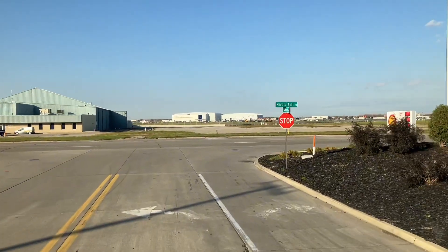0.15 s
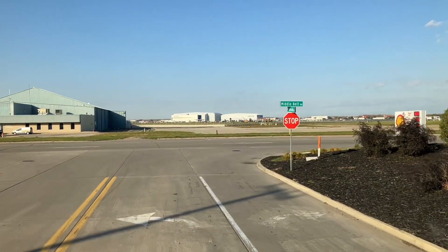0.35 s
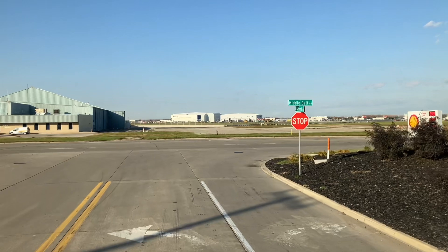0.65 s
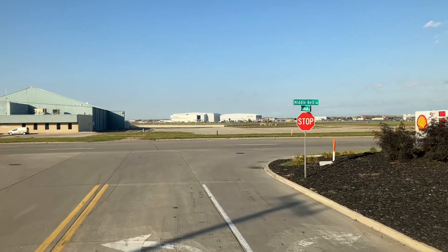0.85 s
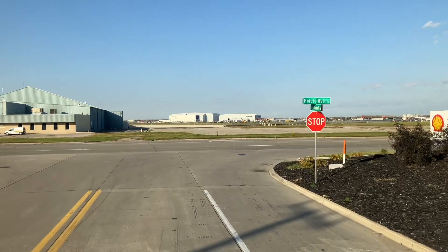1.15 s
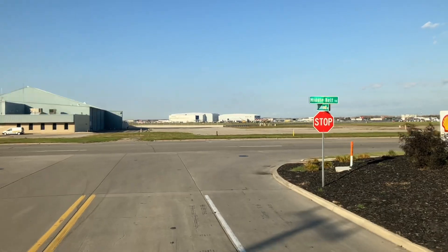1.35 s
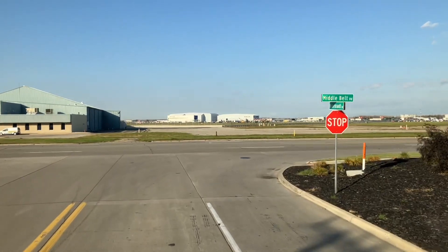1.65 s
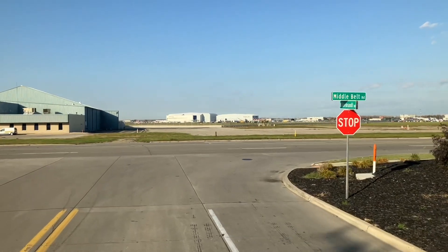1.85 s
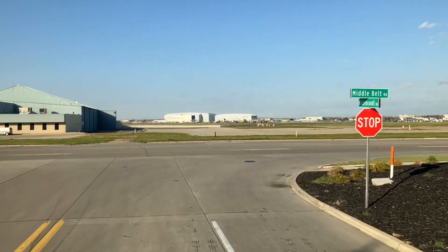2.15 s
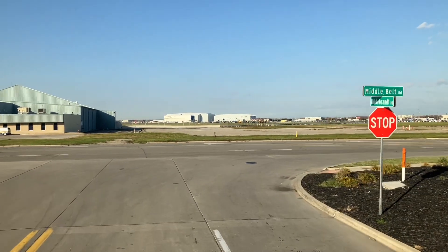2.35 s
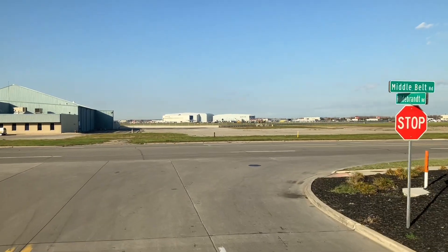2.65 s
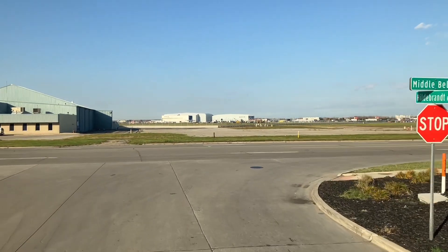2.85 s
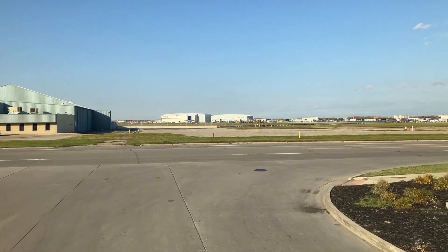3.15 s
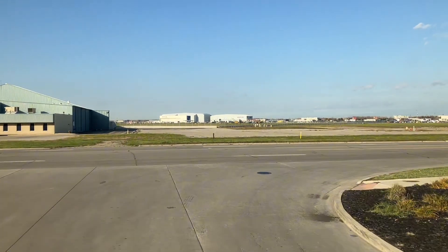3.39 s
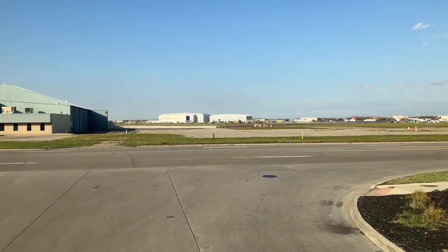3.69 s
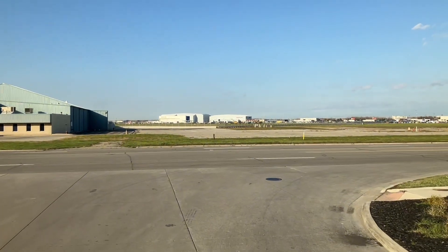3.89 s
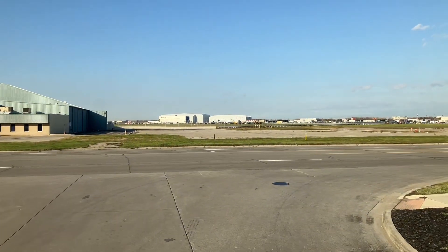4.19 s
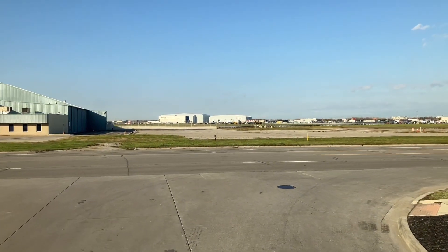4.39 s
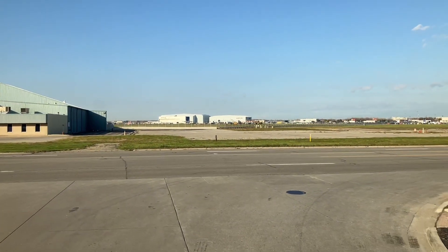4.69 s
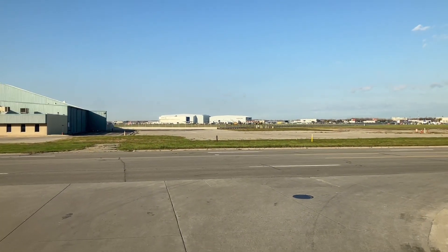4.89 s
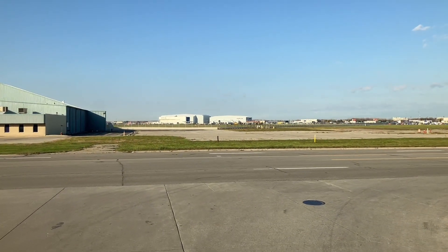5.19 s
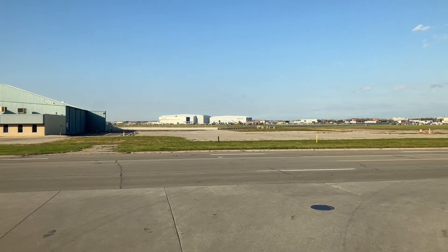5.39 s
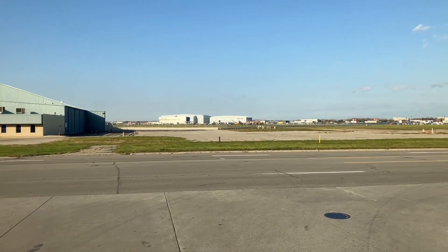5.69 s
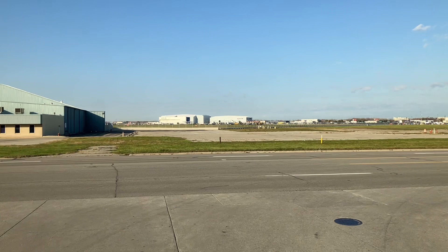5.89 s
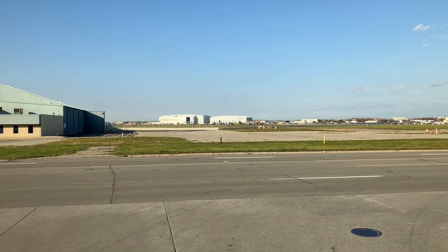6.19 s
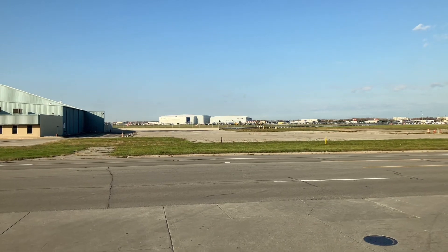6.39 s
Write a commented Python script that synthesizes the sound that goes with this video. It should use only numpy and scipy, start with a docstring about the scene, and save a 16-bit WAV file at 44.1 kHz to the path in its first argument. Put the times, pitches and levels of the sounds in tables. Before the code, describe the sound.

The sound is heard from inside the cab of a slowing truck. From the start, a diesel engine booms deeply over steady tyre noise, with a light clatter that fades by about 2 seconds. The turn signal ticks and tocks evenly throughout, about three clicks a second. From around 1 second the engine sinks gradually in pitch, humming through the cab, and a very faint turbo whistle falls in spurts until about 6 seconds. The boom swells between roughly 1.3 and 4 seconds, then eases. Faint squeaks come from the cab just before 1 second and around 2.5 seconds, the latter with a couple of small dry clicks from the trim. At about 6.1 seconds the horn gives one loud, brassy blast of two close notes sounding together. It lasts a quarter of a second, briefly pushing the other sounds down, and dies away quickly.

```python
"""Inside a truck cab rolling up to a junction. From the start the diesel booms at its firing rate and
clatters over the tyre roar, while the indicator relay ticks steadily. As the engine winds down, its
orders hum through the cab's air resonances and the turbo whistles ever lower; the trim clicks and
squeaks faintly. Near the end two diaphragm horns, about a whole tone apart, sound one short blast,
which pushes an automatic gain control down."""
import sys
import numpy as np
from scipy import signal
from scipy.fft import rfft, irfft, next_fast_len
from scipy.io import wavfile
from scipy.ndimage import uniform_filter1d, minimum_filter1d, map_coordinates

SR = 44100
rng = np.random.default_rng(int(sys.argv[2]) if len(sys.argv) > 2 else 0)


def wav_record(signal):
    """Record a signal, one row per channel, as 16-bit PCM in the file named by sys.argv[1]."""
    frames = np.transpose(np.atleast_2d(signal))
    bounded = np.clip(frames, -1, 1)
    # unit amplitude maps onto the largest positive 16-bit level
    quanta = np.round(bounded * 32767).astype(np.int16)
    wavfile.write(sys.argv[1], SR, quanta)


N = 288414
TIME = np.arange(N) / SR

# Levels in the tables are relative: each source adds its own gain.
# Firing rate of the slowing diesel: time_s, rate_hz
FIRING_RATE = [(0, 60), (.45, 62), (.67, 60), (1, 54.3), (1.3, 49.1), (1.8, 49), (2.2, 47.7), (2.5, 45.3),
               (2.66, 48), (2.85, 46.2), (3.17, 45.1), (3.6, 44.7), (4, 42.7), (4.6, 40.9), (4.9, 40),
               (5.3, 38.2), (6.54, 36.5)]
# Exhaust boom: time_s, level_db
BOOM_LEVEL = [(0, -20), (.1, -16.5), (.3, -24), (1.15, -20), (1.32, -13), (1.75, -11), (2.1, -15.5),
              (2.54, -14), (2.67, -26), (2.8, -16), (3.05, -17), (3.3, -13), (3.65, -10.5), (3.85, -15),
              (4.2, -15.5), (4.5, -21.5), (6.05, -25.5), (6.54, -47)]
# Spectrum of the cab panels shaken by the engine: frequency_hz, level_db
PANEL_SPECTRUM = [(35, -42), (60, 0), (134, -20.5), (194, -14), (255, -16), (297, -20), (334, -18.5),
                  (386, -36.5), (520, -23.5), (680, -63.5), (1140, -120)]
# Shaft and accessory orders: firing_multiple, level_db
HUM_ORDERS = [(1.75, -30.5), (2, -22.5), (3, -29), (3.5, -25.5), (4, -32.5), (4.35, -37), (5.25, -36.5),
              (5.75, -31), (7.5, -34.5), (8.75, -25.5), (9.5, -28)]
# Air resonances of the cab: centre_hz, width_hz, level_db
CAB_MODES = [(74.8, 10.7, 1.5), (89.4, 10.2, 0), (113.5, 15, -5.5), (139.3, 3.6, -13), (160.8, 6.5, -6),
             (184.1, 6.9, -2), (198.8, 13.4, 0), (214.4, 8.3, -12.5), (244.5, 11, -9.5), (259.4, 15.6, 2),
             (337.6, 16.3, -6.5), (374, 19, -17)]
# Diesel clatter, loud while the engine pulls: time_s, level_db
CLATTER_LEVEL = [(0, -37.5), (.25, -35), (.6, -38.5), (.9, -43), (1.05, -54), (1.25, -43), (1.6, -44),
                 (1.95, -38), (2.15, -54), (6.5, -63)]
# Resonances of the engine block: centre_hz, width_hz, level_db
BLOCK_MODES = [(612, 38, 0), (1008, 80, -0.5), (1154, 61, -1), (1440, 120, -9)]

# Partials of the low and the high horn: harmonic_number, left_db, right_db
LOW_HORN_PARTIALS = [(1, -17, -11.5), (2, -25, -31), (3, -17, -20.5), (4, -28.5, -32.5), (5, -37.5, -41),
                     (6, -25, -31.5), (7, -55, -45), (8, -36, -44), (9, -34.5, -38), (10, -56, -46),
                     (11, -35, -61), (12, -53, -36.5), (13, -44, -40), (14, -48, -55), (15, -46, -42),
                     (16, -53, -47), (17, -48, -46), (18, -49, -42), (19, -51, -45), (20, -47, -48),
                     (21, -49, -47)]
HIGH_HORN_PARTIALS = [(1, -21.5, -19), (2, -21, -20.5), (3, -49, -45), (4, -30, -33), (5, -23.5, -28),
                      (6, -36.5, -49), (7, -48, -33), (8, -35.5, -36.5), (9, -44, -37.5), (10, -42, -46),
                      (11, -42, -55), (12, -52, -45), (13, -55, -45), (14, -59, -56), (15, -49, -51),
                      (16, -52, -45), (17, -52, -49), (18, -48, -54), (19, -46, -51)]
# Faint top partials of the horns, with fixed filter notches near 9 and 13.3 kHz: frequency_hz, level_db
NOTCHED_HORN_TREBLE = [(7800, -46.5), (8300, -71), (9100, -92), (10000, -57), (11000, -54.5), (12200, -62),
                       (13300, -74), (15500, -61)]
# Ring after release, which each horn scales: frequency_hz, base_t60_s
HORN_DECAY = [(350, 0.19), (390, 0.4), (700, 0.24), (1100, 0.098), (3000, 0.12), (10000, 0.085)]
# Spectrum of the horns' rasp: frequency_hz, level_db
RASP_SPECTRUM = [(250, 0), (500, -1.5), (1200, 0.5), (3000, 1.5), (7000, -11), (11000, -27), (15500, -29.5)]

# Modes of the relay's case as it pulls in (tick) and drops out (tock): frequency_hz, level_db
TICK_MODES = [(602, 1), (1001, -9), (1195, 0.5), (1453, -7.5), (2034, -5.5), (2110, -11.5), (2562, -11),
              (2700, -1), (2756, 0.5), (2939, -1.5), (3020, -3), (3326, -7), (3413, -8), (3499, -9),
              (3692, -7), (4349, -7.5), (5232, -11), (5350, -11.5)]
TOCK_MODES = [(958, 3), (1098, 3.5), (1442, -3), (2030, -7.5), (2121, -0.5), (2390, -3.5), (2450, 1),
              (2939, -13), (3025, -8.5), (3262, -9), (3413, -7), (3811, -15), (4220, -15), (4748, -20),
              (5360, -20), (5566, -14.5)]
# Spectrum of the relay's contact: frequency_hz, level_db
CRACK_SPECTRUM = [(500, -24), (1200, -8), (3000, -2.5), (3650, -2.5), (3950, -15), (4450, -4.5),
                  (5100, -13.5), (5400, -5.5), (5750, -17.5), (6300, -21.5), (12000, -41)]

# The turbo running down: time_s, pitch_hz
TURBO_PITCH = [(1, 6600), (1.3, 6430), (1.95, 6300), (2.4, 5980), (3.05, 5670), (3.76, 5260), (4.6, 4760),
               (5.25, 4340), (6, 3830)]
# Turbo whistle spurts: start_s, shape_s, end_s, pitch_multiple, blur_fraction, level_db
# A spurt swells until shape_s; rows with shape_s before start_s only fade.
TURBO_SPURTS = [(1.1, 1.3, 1.4, 1, .002, -66), (1.85, 2.1, 2.4, 1, .002, -67),
                (2.95, 2.5, 3.95, 1, 0.0027, -71), (4.45, 5.3, 5.7, 1, .005, -70),
                (5.22, 5.25, 5.33, 1, .005, -57.5), (5.5, 5.59, 5.95, 1, 0.007, -65),
                (3.25, 3.3, 3.65, 1.375, 0.0057, -68.5), (3.68, 3.1, 4.7, 1.375, .007, -57.5),
                (4.7, 4.8, 5.1, 1.375, .007, -65), (3.5, 3.3, 3.8, 2, .004, -67)]

# Tyre roar as the truck slows: time_s, level_db
TYRE_LEVEL = [(0.0, -36), (0.23, -36), (1.0, -39.5), (1.79, -37.5), (1.97, -37.5), (2.17, -40.5),
              (2.94, -40), (3.09, -40.5), (6.0, -42.5)]
# Spectrum of the roar: frequency_hz, level_db
TYRE_SPECTRUM = [(250, -38), (340, -6), (420, -4), (580, -6.5), (790, -8), (886, -15.5), (1010, -10),
                 (1160, -11), (1500, -17), (1770, -23.5), (2680, -30), (5000, -44), (6500, -73),
                 (11000, -120)]
# Air hiss: time_s, level_db
HISS_LEVEL = [(0.0, -64.5), (0.8, -64), (0.92, -66.5), (1.27, -69), (1.55, -65.5), (2.17, -70),
              (3.53, -66.5), (3.81, -71), (5.11, -71), (5.43, -73.5), (5.9, -73.5), (6.0, -67.5)]
# Thin air hiss, with fixed filter notches at 9 and 13.5 kHz: frequency_hz, level_db
NOTCHED_HISS = [(1500, -12), (3000, -3), (5000, -1), (7000, 3.5), (9000, -16.5), (11500, 1), (13500, -20.5),
                (15500, -7)]
# Clicks of the cab trim: time_s, level_db, centre_hz
TRIM_CLICKS = [(2.236, -47, 5030), (2.618, -38.5, 10400)]
# Squeaks of the cab, then of the horn as it catches:
# start_s, pitch_hz, glide_hz_per_s, level_db, length_s, blur_fraction
SQUEAKS = [(.55, 10300, 1, -59, 0.33, 0.012), (0.833, 10350, 1, -53, .13, .016),
           (.88, 2380, -500, -49.5, 0.12, .04), (2.431, 2560, 547.5, -58, 0.36, 0.0415),
           (6.014, 7070, 0, -40, 0.025, .005), (6.035, 7360, 0, -43, 0.029, .015),
           (6.028, 3620, 0, -39, 0.021, .015), (6.048, 3620, -0.5, -43, 0.015, .015)]
# Likeness of left and right in the cab: frequency_hz, correlation
CAB_CORRELATION = [(60, 0.86), (130, 0.91), (290, 0.57), (640, -0.13), (3000, -0.064), (15000, 0.15)]
# Balance of the cab's sound field: frequency_hz, left_minus_right_db
CAB_BALANCE = [(60, 1.5), (110, 3), (200, -3.5), (380, 0), (700, 3.5), (1300, 0.5), (3000, 0)]

HORN_ON_S, HORN_OFF_S = 6.075, 6.32
LOW_HORN_HZ, HIGH_HORN_HZ = 351.05, 390.5
TOP_HZ = 15800
OPPOSED = np.array([[1], [-1]])  # opposite signs for left and right


def engine(firing_hz, level_db, cylinders=6):
    """Periodic forcing: a boom at the firing rate, orders from uneven cylinders, a throbbing rumble."""
    cycle = phase_of(firing_hz) / cylinders
    boom = amp(curve(BOOM_LEVEL) - 0.5 + 1.3 * wobble(16)) * unit(np.sin(cylinders * cycle))
    orders = np.zeros((2, N))
    for k in range(cylinders + 1, cylinders * (cylinders + 1) + 1):
        strength_db = at_hz(PANEL_SPECTRUM, firing_hz * k / cylinders) + 3 * wobble(3.005)
        spread = rng.normal(0, 0.24) * OPPOSED
        phase = k * cycle + rng.uniform(0, 2 * np.pi) + spread + 0.56 * wobble(7)
        orders += amp(strength_db) * np.sin(phase)
    orders = unit(filtered(orders, cab_balance))
    rumble = cab_noise(PANEL_SPECTRUM) * (1 + 0.58 * np.cos(cylinders * cycle)) * amp(3 * wobble(16))
    return boom * pan(-1.3) + amp(level_db - 4) * orders + amp(level_db - 3) * rumble


def cab_hums(firing_hz):
    """Resonance: each order swells on an air mode of the cab and fades as the engine slows past it."""
    out = np.zeros((2, N))
    for order, db in HUM_ORDERS:
        hz = order * firing_hz
        resonance = sum(amp(mode_db) / (1 + (2 * (hz - centre) / width) ** 2)
                        for centre, width, mode_db in CAB_MODES)
        tone = unit(np.sin(phase_of(hz) + rng.uniform(0, 2 * np.pi) + 0.1 * wobble(9)))
        out += amp(db - 3 + 1.68 * wobble(8)) * resonance * tone * cab_balance(hz)
    return out


def diesel_clatter(firing_hz):
    """Modal excitation: each firing rattles the engine block, some harder than others."""
    def block(hz):
        return sum((-1) ** k * amp(db) * 1j * resonator(hz, centre, width)
                   for k, (centre, width, db) in enumerate(BLOCK_MODES))
    throb = 1 + 0.69 * np.cos(phase_of(firing_hz))
    bursts = throb * amp(wobble(40)) * rng.standard_normal((2, N))
    return amp(curve(CLATTER_LEVEL)) * unit(filtered(bursts, block)) * pan(3)


def horn_blast():
    """Beating: two horns sound together, over a faint rasp that builds as they catch."""
    low = horn(LOW_HORN_HZ, LOW_HORN_PARTIALS, gain_db=8.5, neighbour_hz=HIGH_HORN_HZ,
               ring_scale=1.21, jitter=0.0004, rough_rad=0.015, flutter_db=0.4)
    high = horn(HIGH_HORN_HZ, HIGH_HORN_PARTIALS, gain_db=9, neighbour_hz=LOW_HORN_HZ,
                ring_scale=0.98, jitter=0.00032, rough_rad=0.013, flutter_db=0.47)
    rasp_db = -28.5 - 650 * np.maximum(HORN_ON_S - TIME, 0) - 450 * np.maximum(TIME - HORN_OFF_S, 0)
    buzz = 1 + 0.3 * np.sin(2 * np.pi * LOW_HORN_HZ * TIME)
    return low + high + amp(rasp_db) * cab_noise(RASP_SPECTRUM) * buzz


def horn(pitch_hz, partials, gain_db, neighbour_hz, ring_scale, jitter, rough_rad, flutter_db):
    """Self-sustained oscillation: a diaphragm buzzes on a flared pipe, shaken by its neighbour."""
    live = TIME > HORN_ON_S - 0.12
    t = TIME[live]
    sharp, settle_s = 0.018, 0.013  # the note starts sharp and settles
    settling = np.exp(-np.maximum(TIME - HORN_ON_S, 0) / settle_s)
    moving_hz = pitch_hz * (1 + sharp * settling + jitter * wobble(200))
    coupling = 0.041 * np.sin(2 * np.pi * neighbour_hz * TIME)
    phase = (phase_of(moving_hz) + coupling + rough_rad * wobble(500))[live]
    ragged_db = 4 * (settling[live] + np.clip((t - HORN_OFF_S) / settle_s, 0, 1))
    tilt_db_per_octave = -0.05 * np.exp(-np.maximum(t - HORN_ON_S, 0) / 0.066)
    out = np.zeros((2, N))
    for k in range(1, int(TOP_HZ / pitch_hz)):
        hz = k * pitch_hz
        treble_db = at_hz(NOTCHED_HORN_TREBLE, hz) + rng.normal(0, 3, 2)
        db = np.array(partials[k - 1][1:]) if k <= len(partials) else treble_db
        waver_db = (flutter_db * np.sqrt(k) + ragged_db) * np.array([wobble(55, t), wobble(55, t)])
        level = amp(db[:, None] + gain_db + tilt_db_per_octave * np.log2(k) + waver_db)
        # standing waves in the cab put the two sides a quarter cycle apart
        offset = rng.uniform(0, 2 * np.pi) + rng.choice([-1, 1]) * np.pi / 4 * OPPOSED
        out[:, live] += level * np.sqrt(2) * np.sin(k * phase + offset) * horn_envelope(hz, t, ring_scale)
    return out


def horn_envelope(hz, t, ring_scale):
    """Onset and free decay: the fundamental swells first, overtones snap in later, all ring out."""
    lowness = (LOW_HORN_HZ / hz) ** 2
    onset_s = HORN_ON_S + 0.007 * (1 - lowness)
    rise_s = 0.0028 + 0.0058 * lowness
    swell = 1 / (1 + np.exp(np.clip((onset_s - t) / rise_s, -50, 50)))
    t60_s = ring_scale * at_hz(HORN_DECAY, hz)
    return swell * amp(-60 * np.maximum(t - HORN_OFF_S, 0) / t60_s)


def indicator(first_s=0.17119, period_s=0.64, lamp_on_s=0.32):
    """Periodic switching: each blink, the relay pulls in with a tick and drops out with a blunter tock."""
    on_s = np.arange(first_s, N / SR - period_s / 2, period_s)
    off_s = on_s + lamp_on_s
    ticks = relay(on_s, TICK_MODES, gain_db=-32, lean_db=0.5, t60_s=0.081, rise_s=0.0034,
                  crack_db=0, crack_t60_s=0.098, vary_db=1.4)
    tocks = relay(off_s, TOCK_MODES, gain_db=-31.5, lean_db=0.7, t60_s=0.082, rise_s=0.011,
                  crack_db=-3, crack_t60_s=0.11, vary_db=0.4)
    return ticks + tocks + dashboard_knocks(off_s + 0.00505)


def relay(times_s, case_modes, gain_db, lean_db, t60_s, rise_s, crack_db, crack_t60_s, vary_db):
    """Impact excitation: the armature lands with a short crack, and the modes of the case ring."""
    out = np.zeros((2, N))
    t = np.arange(SR // 6) / SR
    hz, strengths_db = np.transpose(case_modes)
    hz = hz[:, None, None]
    phase = rng.uniform(0, 2 * np.pi, hz.shape) + rng.choice([-1, 1], hz.shape) * np.pi / 4 * OPPOSED
    modes = np.sin(2 * np.pi * hz * t + phase) * struck(t, t60_s, rise_s)
    crack = snap(lambda f: amp(at_hz(CRACK_SPECTRUM, f)), crack_t60_s, rise_s=0.00055, samples=len(t))
    for start_s in times_s:
        strengths = amp(strengths_db + vary_db * rng.standard_normal(len(hz)))
        ring = np.tensordot(strengths, modes, 1)
        add(out, start_s, amp(gain_db) * pan(lean_db) * (ring + amp(crack_db) * crack))
    return out


def dashboard_knocks(times_s, pitch_hz=656):
    """Damped oscillation: the dashboard answers the relay with a hollow knock."""
    out = np.zeros((2, N))
    t = np.arange(SR // 8) / SR
    for start_s in times_s:
        tone = np.sin(2 * np.pi * pitch_hz * t + rng.normal(0, 0.18, (2, 1)))
        add(out, start_s, amp(-19.5) * tone * struck(t, t60_s=0.047, rise_s=0.0031))
    return out


def turbo(dip_db=5, cut_db_per_s=131, flutter_db=4.5):
    """Random modulation: unsteady flow blurs the turbo's falling tones and breaks them into spurts."""
    out = np.zeros((2, N))
    turbo_hz = curve(TURBO_PITCH)
    for start_s, shape_s, end_s, multiple, blur, db in TURBO_SPURTS:
        phase = phase_of(multiple * turbo_hz * (1 + blur * wobble(300)))
        dip = np.interp(TIME, [start_s, shape_s, end_s], [1, 0, 1])
        outside_s = np.abs(TIME - np.clip(TIME, start_s, end_s))
        level = amp(db - dip_db * dip - cut_db_per_s * outside_s + flutter_db * wobble(36))
        out += [level * unit(np.sin(phase + 0.94 * wobble(30))) for _ in range(2)]
    return out


def road_noise(firing_hz):
    """Broadband noise: tyre roar, swelling slightly with each firing, under a thin notched air hiss."""
    throb = 1 + 0.064 * np.cos(phase_of(firing_hz))
    roar = amp(curve(TYRE_LEVEL) + 6 + 0.55 * wobble(10)) * unit(throb * cab_noise(TYRE_SPECTRUM))
    hiss = amp(curve(HISS_LEVEL) + 11 + 1.2 * wobble(8.8)) * cab_noise(NOTCHED_HISS)
    return roar + hiss


def trim_clicks():
    """Heavy damping: plastic trim clicks dryly through one broad resonance."""
    out = np.zeros((2, N))
    for start_s, db, centre_hz in TRIM_CLICKS:
        click = snap(lambda hz: resonator(hz, centre_hz, centre_hz), t60_s=0.023, rise_s=0.0003)
        add(out, start_s, amp(db + 7.5) * click)
    return out


def squeaks():
    """Frequency modulation: short chirps, roughened by pitch jitter, some of them sliding."""
    out = np.zeros(N)
    for start_s, pitch_hz, glide, db, length_s, blur in SQUEAKS:
        age_s = TIME - start_s
        arch = np.sin(np.pi * np.clip(age_s / length_s, 0, 1))
        hz = (pitch_hz + glide * age_s) * (1 + blur * wobble(700))
        out += amp(db) * arch * np.sin(phase_of(hz))
    return out


def snap(response, t60_s, rise_s, samples=5000):
    """Scattering: the dashboard spreads a contact into a noise burst coloured by its resonances."""
    t = np.arange(samples) / SR
    burst = filtered(rng.standard_normal((2, samples)) * struck(t, t60_s, rise_s), response)
    return burst / np.linalg.norm(burst) * np.sqrt(t60_s * SR) / 5


def cab_noise(spectrum):
    """Spatial coherence: stereo noise of rms 1, alike in the bass and diffuse in the treble."""
    def mid_and_side(hz):
        angle = np.arccos(np.clip(at_hz(CAB_CORRELATION, hz), -1, 1)) / 2
        return amp(at_hz(spectrum, hz)) * [np.cos(angle), np.sin(angle)]
    mid, side = filtered(rng.standard_normal((2, N)), mid_and_side)
    return unit(filtered(np.array([mid + side, mid - side]), cab_balance))


def cab_balance(hz):
    """Left and right gains of the cab at each frequency."""
    return pan(at_hz(CAB_BALANCE, hz))


def resonator(hz, centre_hz, width_hz):
    """Complex response of a second-order resonance."""
    return hz * width_hz / (centre_hz ** 2 - hz ** 2 + 1j * hz * width_hz)


def struck(t, t60_s, rise_s):
    """Exponential decay after a quick rise."""
    return amp(-60 * t / t60_s) * (1 - np.exp(-t / rise_s))


def amp(db):
    """Decibels to gain."""
    return 10 ** (np.asarray(db) / 20)


def unit(x):
    """Scaled to rms 1."""
    return x / np.sqrt(np.mean(x ** 2) + 1e-20)


def at_hz(table, hz):
    """Interpolation on a log frequency axis."""
    table_hz, values = np.transpose(table)
    return np.interp(np.log(hz + 1), np.log(table_hz + 1), values)


def curve(table):
    """Interpolation in time, one value a sample."""
    return np.interp(TIME, *np.transpose(table))


def wobble(rate, t=TIME):
    """A smooth random curve, rate knots a second."""
    return map_coordinates(rng.standard_normal(int(N * rate / SR) + 4), [t * rate])


def phase_of(hz):
    """Phase in radians, the integral of frequency."""
    return 2 * np.pi * np.cumsum(hz) / SR


def pan(lean_db):
    """Left and right gains for a level difference."""
    return amp(OPPOSED * lean_db / 2)


def filtered(x, response):
    """Linear filtering: the spectrum of x times a response of frequency."""
    size = next_fast_len(x.shape[-1] + 8192)
    return irfft(rfft(x, size) * response(np.fft.rfftfreq(size, 1 / SR)), size)[..., :x.shape[-1]]


def add(track, start_s, sound):
    """Lay a short sound into the track."""
    part = track[:, round(start_s * SR):][:, :sound.shape[1]]
    part += sound[:, :part.shape[1]]


def gain_control(x, limit_db, hold_s, release_db_per_s, attack_s):
    """Limiting: loud sound above the bass turns the gain down; it holds a moment, then recovers."""
    sensed = filtered(x, lambda hz: hz ** 2 / (hz ** 2 + 150 ** 2))
    power = np.abs(uniform_filter1d(np.mean(sensed ** 2, axis=0), size=600))
    excess_db = np.maximum(10 * np.log10(power + 1e-12) - limit_db, 0)
    half_hold = int(hold_s * SR / 2)
    held_db = -minimum_filter1d(-excess_db, 2 * half_hold + 1, origin=half_hold)
    cut_db = np.maximum.accumulate(held_db + release_db_per_s * TIME) - release_db_per_s * TIME
    pole = np.exp(-1 / (attack_s * SR))
    return x * amp(-signal.lfilter([1 - pole], [1, -pole], cut_db))


def scene(cruise_hz=50, effort_db_per_octave=8.5):
    """Superposition at the driver's seat; engine speed scales the orders, the rumble and the hums."""
    firing_hz = curve(FIRING_RATE)
    effort_db = effort_db_per_octave * np.log2(firing_hz / cruise_hz)
    diesel = engine(firing_hz, level_db=effort_db - 22)
    diesel += amp(effort_db) * cab_hums(firing_hz) + diesel_clatter(firing_hz)
    return diesel + road_noise(firing_hz) + turbo() + indicator() + trim_clicks() + squeaks() + horn_blast()


def record(dry):
    """Automatic gain control, then a low-pass band limit."""
    limited = gain_control(dry, limit_db=-12.5, hold_s=0.11, release_db_per_s=105.5, attack_s=0.0048)
    return filtered(limited, lambda hz: hz < TOP_HZ)


dry = scene()
out = record(dry)
wav_record(out)
```